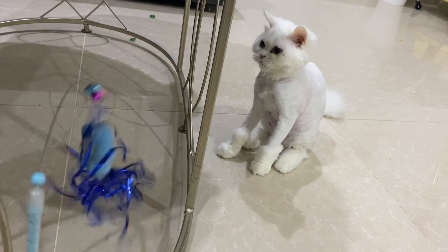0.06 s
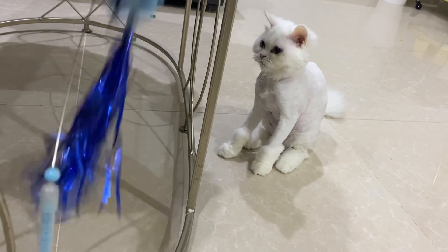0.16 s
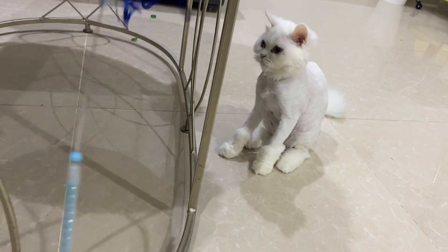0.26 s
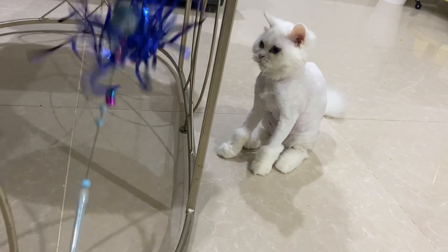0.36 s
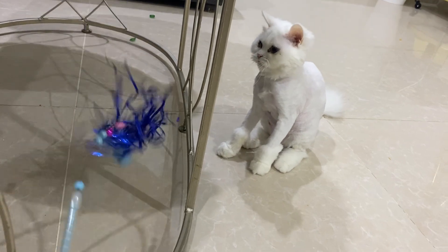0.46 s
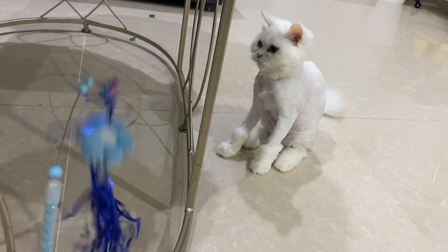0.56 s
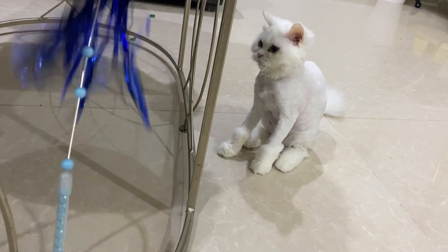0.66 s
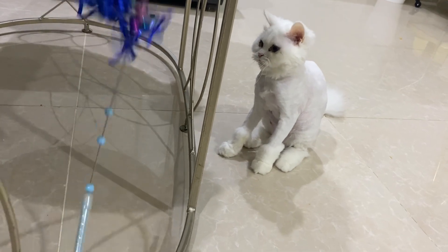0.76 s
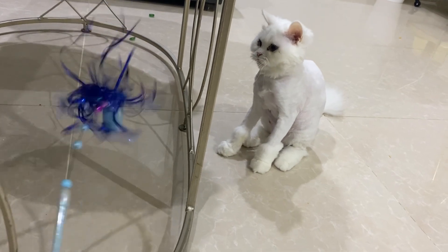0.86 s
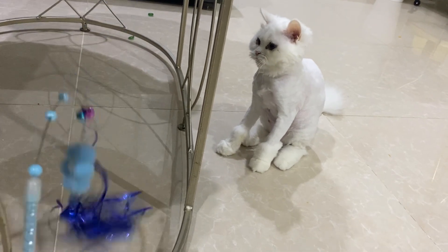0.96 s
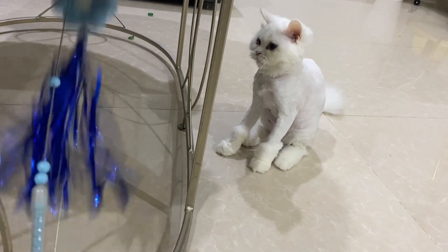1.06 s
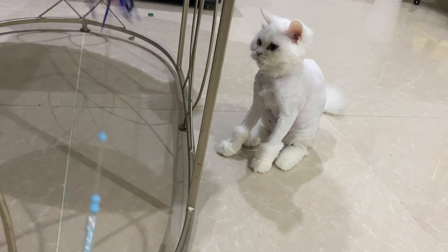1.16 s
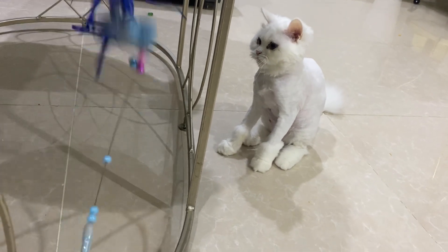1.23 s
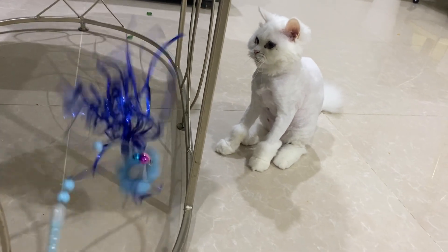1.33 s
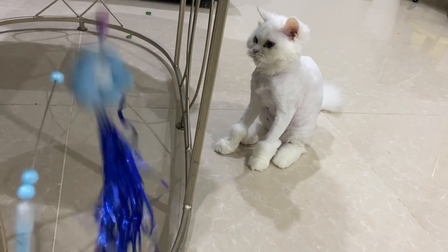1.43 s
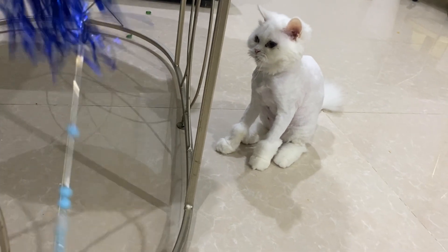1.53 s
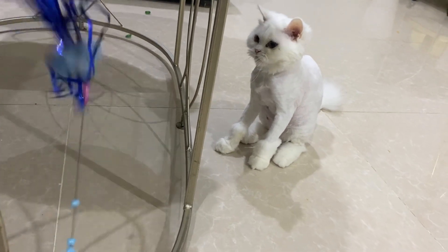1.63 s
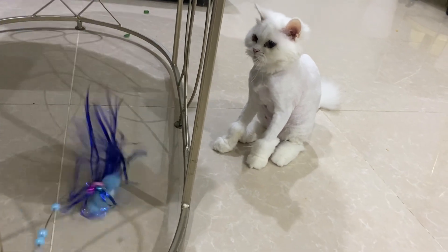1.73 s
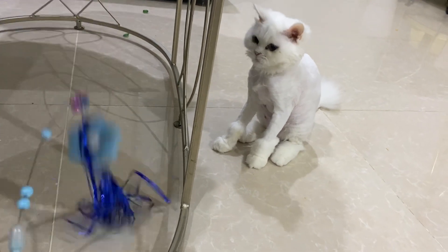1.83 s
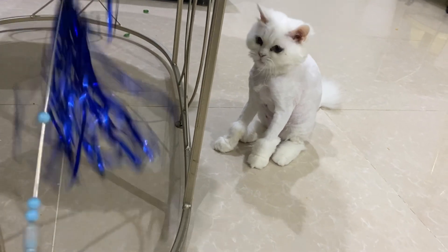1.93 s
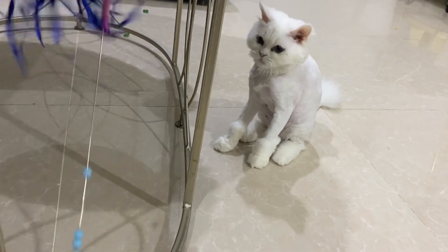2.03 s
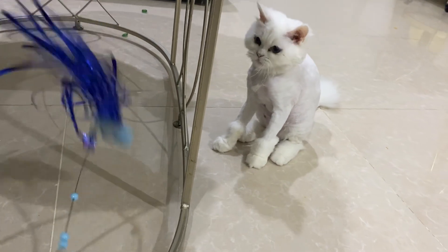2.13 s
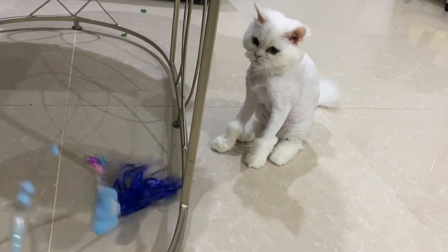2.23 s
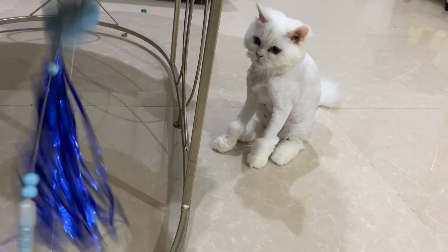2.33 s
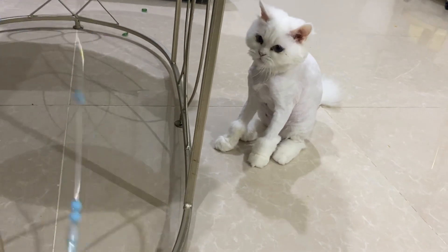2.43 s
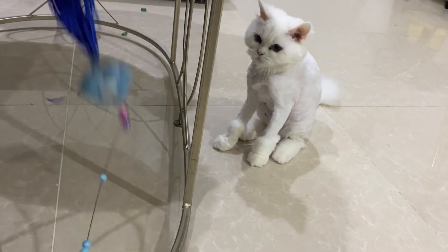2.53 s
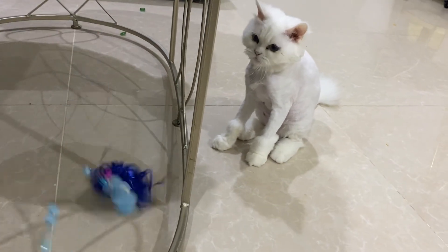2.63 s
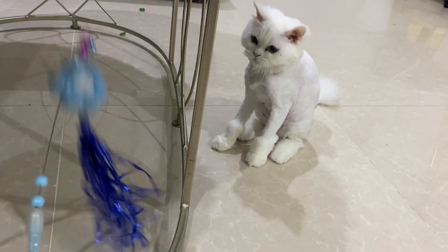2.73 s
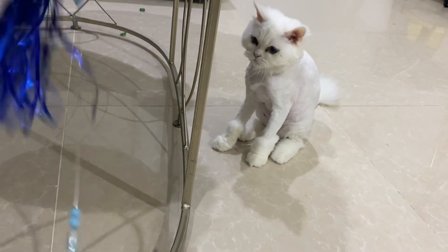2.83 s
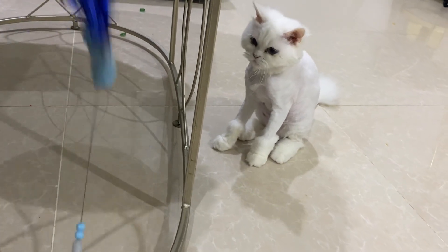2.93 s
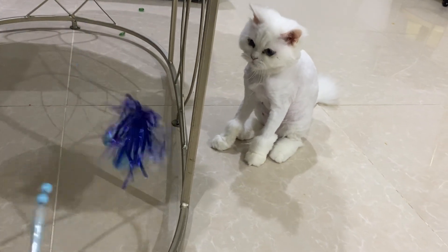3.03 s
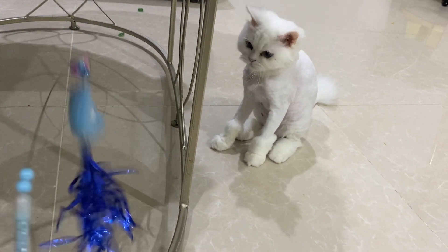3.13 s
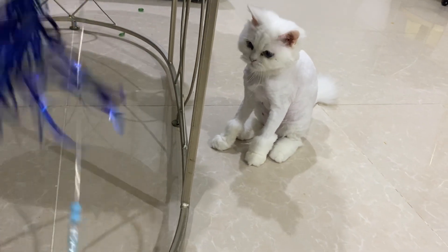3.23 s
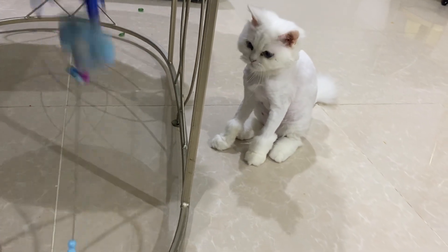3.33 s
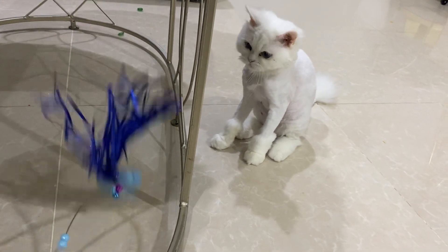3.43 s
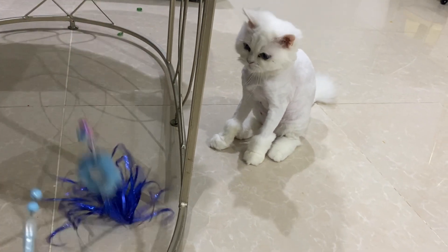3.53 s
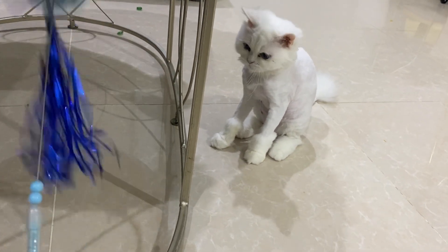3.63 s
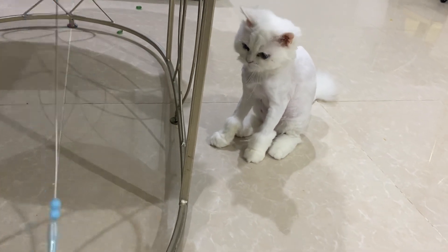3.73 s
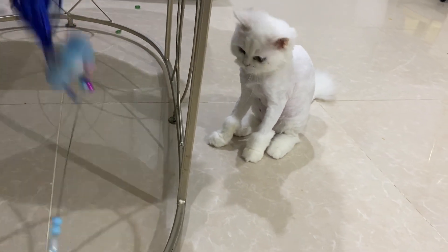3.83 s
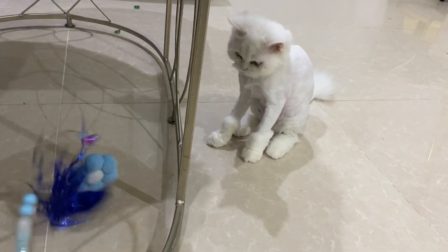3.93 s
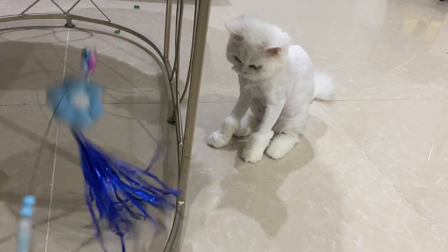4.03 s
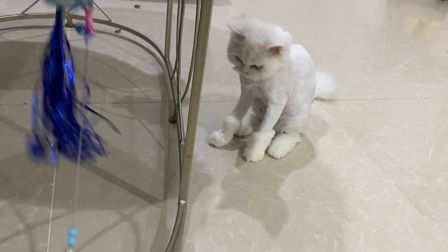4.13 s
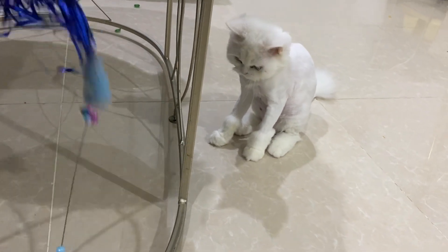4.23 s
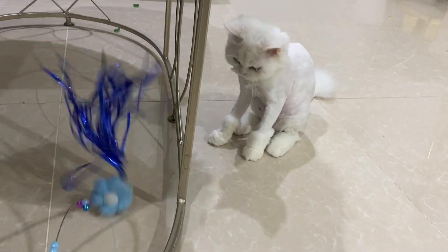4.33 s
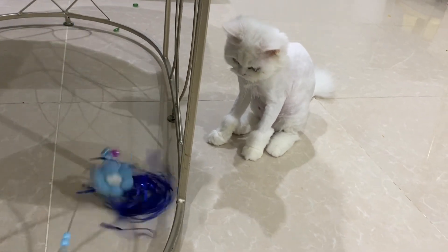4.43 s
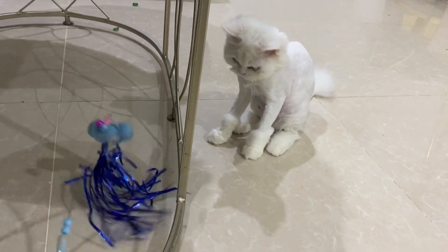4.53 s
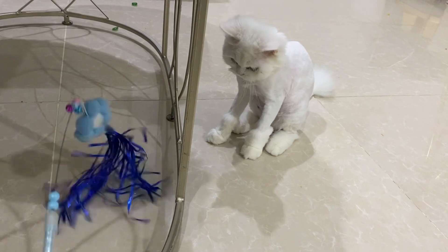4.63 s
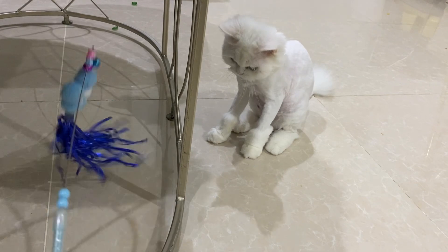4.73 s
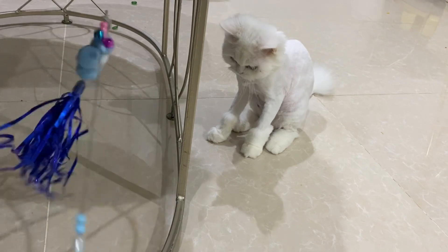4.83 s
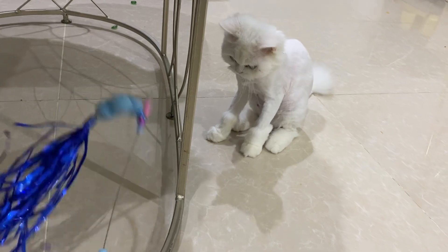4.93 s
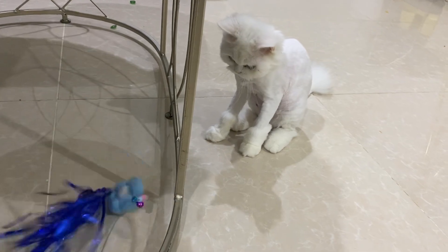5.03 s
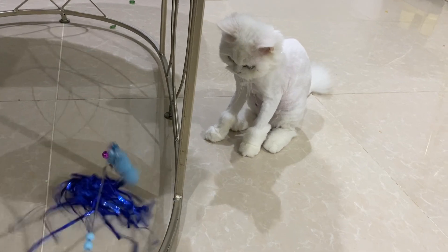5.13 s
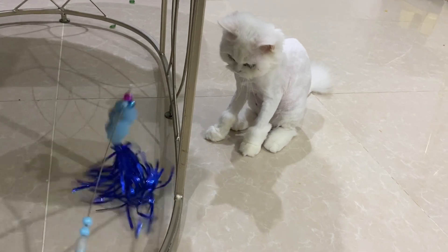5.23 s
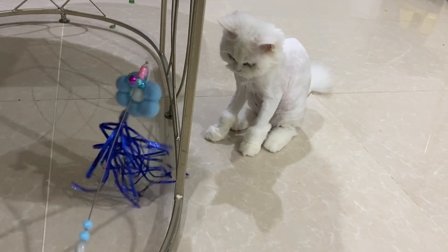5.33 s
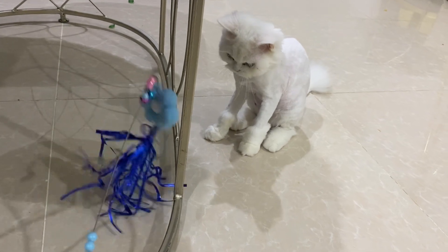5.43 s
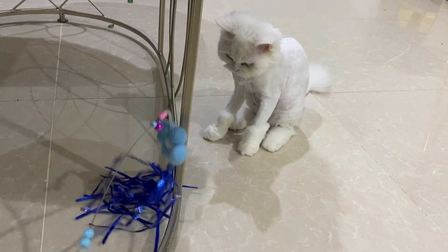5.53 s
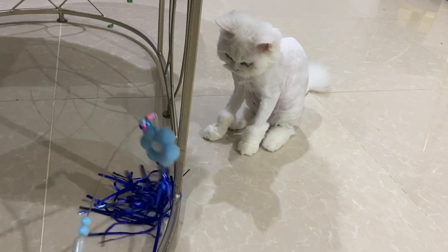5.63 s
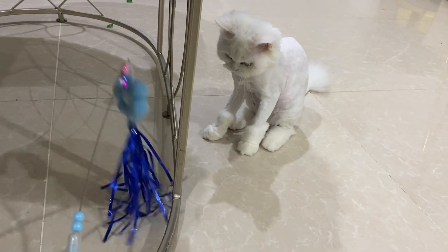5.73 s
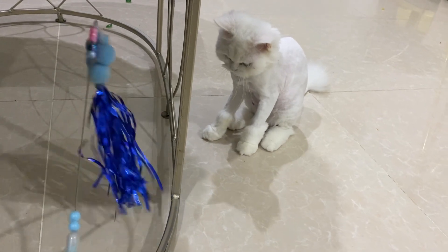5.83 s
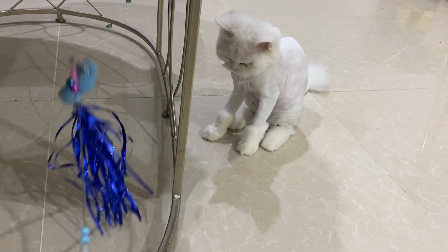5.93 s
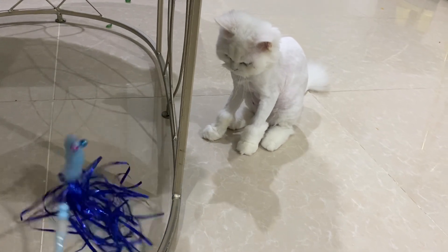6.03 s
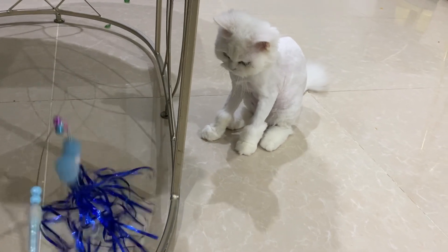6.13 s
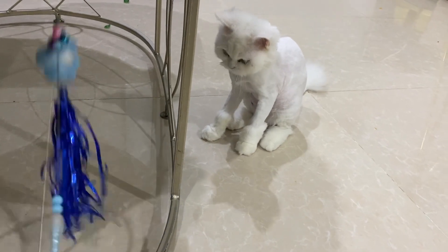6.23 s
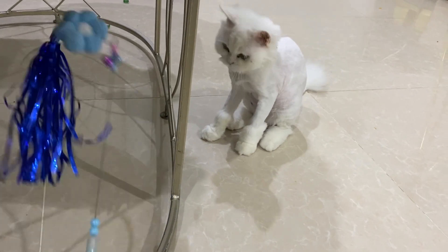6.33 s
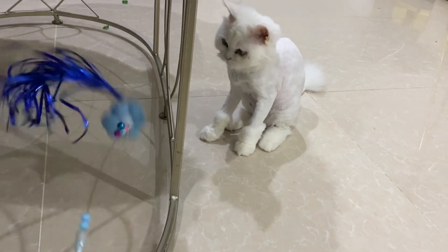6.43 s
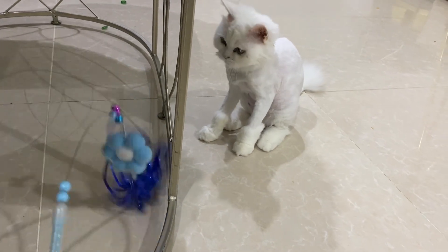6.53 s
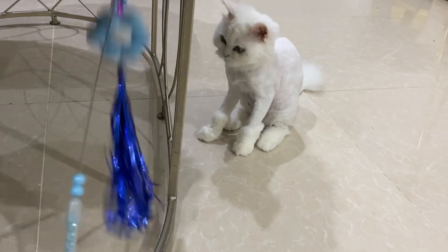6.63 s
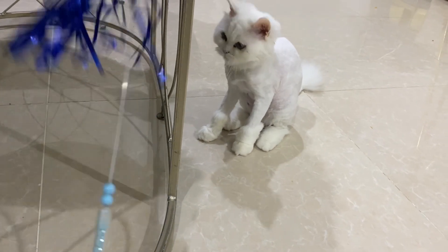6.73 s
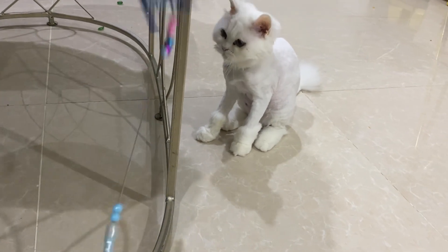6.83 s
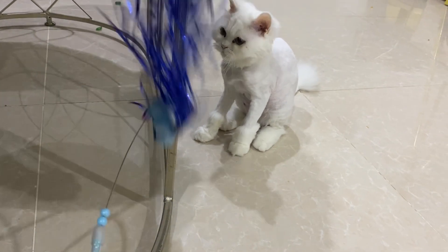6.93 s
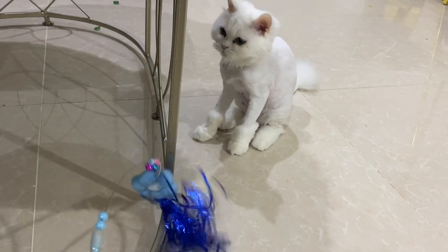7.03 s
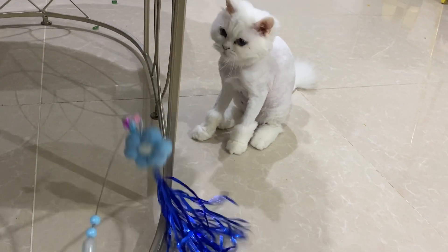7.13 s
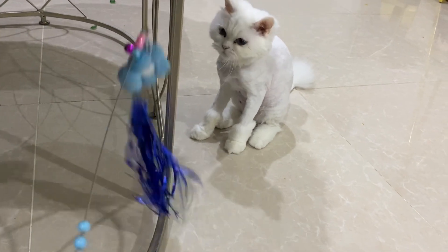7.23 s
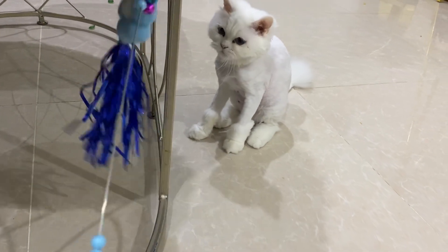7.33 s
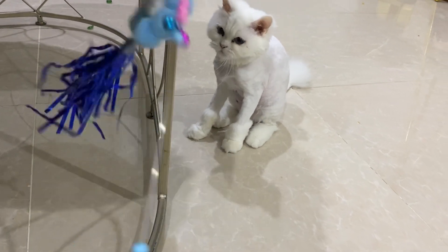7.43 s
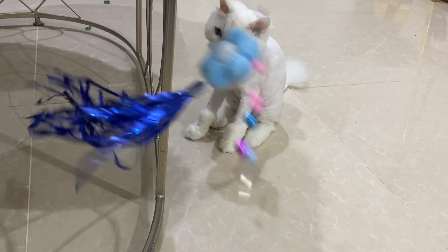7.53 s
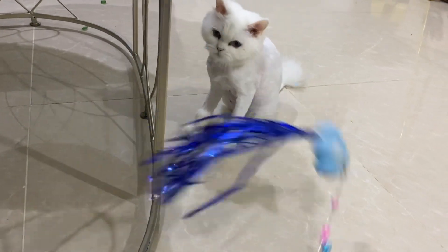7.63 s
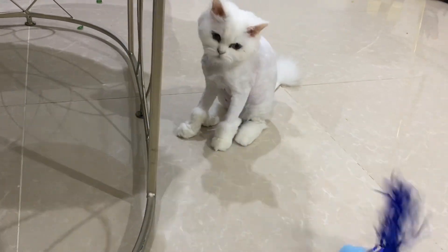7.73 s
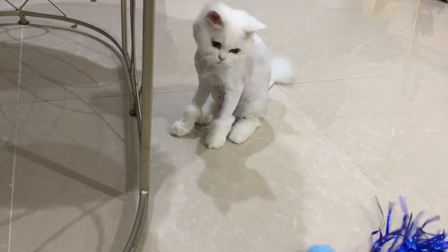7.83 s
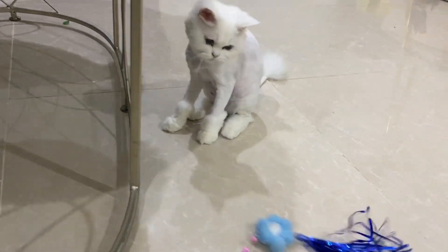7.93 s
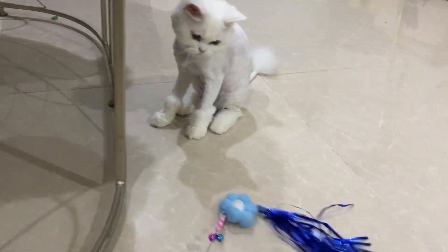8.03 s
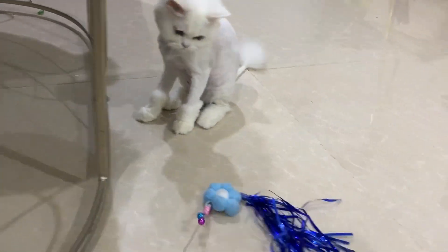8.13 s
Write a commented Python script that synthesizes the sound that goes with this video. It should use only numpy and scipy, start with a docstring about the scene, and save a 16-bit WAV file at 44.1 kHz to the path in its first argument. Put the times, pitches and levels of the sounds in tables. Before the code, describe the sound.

A wand toy is shaken close to the microphone in a tiled room. From the start, a tiny bell rattles in short, very high, uneven jingles, while foil tinsel swishes and crackles and beads give dry clicks. The toy slaps the floor or a table leg at about 0.2, 0.7, 1.5 and 1.7 seconds, then three times between 2.2 and 2.6, with small cracks, hollow thuds and sometimes a faint ring of metal. The tinsel whips most strongly from about 2 to 4 seconds. After that the play thins out, nearly pausing around 5.7 seconds, then picks up near 6. A slap at 6.8 seconds rings the metal frame, and a lighter one follows at 7.7, with jingling and rustling continuing until about 8 seconds. Throughout, a low motor hums and throbs softly over the rumble of the room.

```python
"""A tiled room, a phone's stereo microphone close to a wand toy, the right port facing it.
From the start the toy is flicked up and down: a pellet strikes the shell of a tiny bell, foil tinsel
swishes and crackles, beads click, and the toy slaps floor or table leg, ringing the metal frame.
After 4 s the play thins out; near 6 s it picks up, with two last slaps at 6.8 and 7.7 s.
Behind it all a motor hums and throbs over the room's rumble."""
import sys
import numpy as np
from scipy import signal
from scipy.fft import rfft, irfft, next_fast_len
from scipy.io import wavfile
from scipy.ndimage import uniform_filter1d, map_coordinates

SR = 44100
rng = np.random.default_rng(int(sys.argv[2]) if len(sys.argv) > 2 else 0)


def file_out(sig):
    """Save sig as 16-bit WAV at sys.argv[1]."""
    # one column per channel
    cols = np.atleast_2d(sig).T
    # limit, then scale
    lim = np.clip(cols, -1, 1)
    pcm = np.round(lim * 32767).astype(np.int16)
    wavfile.write(sys.argv[1], SR, pcm)


N = 360738
T, FFT_SIZE = np.arange(N) / SR, next_fast_len(N)

# the clearer strikes of the pellet: start_s, ring_db, tick_db, t60_s
PELLET_STRIKES = [(0.0379, -16, -31, 0.034), (0.0917, -22, -45, 0.053), (0.1697, -20, -10, 0.041),
                  (0.174, -19, -24, 0.03), (0.2667, -22, -24, 0.015), (0.43, -19, -35, 0.037),
                  (0.4345, -15.5, -35, 0.053), (0.5855, -13.5, -27, 0.015), (0.6554, -4, -14, 0.022),
                  (0.7947, -10, -25, 0.024), (0.8061, -19, -41, 0.025), (0.9286, -17, -26.5, 0.015),
                  (1.1159, -10, -19, 0.034), (1.2006, -20.5, -43, 0.029), (1.2664, -29, -42, 0.02),
                  (1.2775, -29.5, -43, 0.06), (1.2834, -26, -42, 0.026), (1.307, -27, -60, 0.016),
                  (1.3538, -17, -27, 0.041), (1.3606, -19, -35, 0.049), (1.3798, -16, -38, 0.029),
                  (1.483, -25, -17, 0.08), (1.4891, -4.5, -16, 0.027), (1.5259, -23, -42, 0.038),
                  (1.6879, -18.5, -26, 0.052), (1.7291, -33, -36, 0.08), (1.7486, -30, -27, 0.069),
                  (1.7873, -13, -25.5, 0.03), (1.8344, -17.5, -42, 0.048), (1.8473, -22, -45, 0.016),
                  (1.919, -17, -34, 0.04), (1.9741, -24, -36.5, 0.026), (1.9972, -29.5, -43, 0.047),
                  (2.0762, -17, -27, 0.023), (2.1032, -21.5, -41, 0.03), (2.123, -30, -44, 0.016),
                  (2.1821, -18, -35, 0.02), (2.1889, -6.5, -18, 0.04), (2.2567, -15, -38, 0.024),
                  (2.309, -7, -34, 0.034), (2.3706, -17, -28, 0.027), (2.488, -24.5, -37, 0.027),
                  (2.4965, -22.5, -27, 0.048), (2.5208, -20.5, -34, 0.029), (2.5365, -31, -40, 0.039),
                  (2.5634, -12, -22, 0.053), (2.613, -20, -37, 0.035), (2.6302, -23, -38, 0.056),
                  (2.7283, -17, -39, 0.045), (2.7441, -23, -39, 0.015), (2.8502, -19, -44, 0.02),
                  (2.9146, -31, -51, 0.015), (2.9193, -29, -51, 0.08), (2.9344, -25.5, -45, 0.065),
                  (2.9992, -7.5, -15.5, 0.015), (3.1125, -11, -33, 0.065), (3.2113, -22, -52.5, 0.046),
                  (3.2242, -21, -44, 0.015), (3.3438, -15, -25, 0.02), (3.3521, -19, -39, 0.02),
                  (3.3895, -24, -30.5, 0.015), (3.424, -24, -30, 0.048), (3.4595, -22, -41, 0.072),
                  (3.4691, -29, -26, 0.018), (3.4892, -24, -29, 0.015), (3.4938, -21.5, -39, 0.08),
                  (3.6733, -11, -19.5, 0.038), (3.7187, -22.5, -45, 0.069), (3.8502, -17, -36, 0.034),
                  (3.8631, -21, -31, 0.016), (3.9278, -27, -45, 0.029), (3.9436, -37, -26, 0.08),
                  (3.9502, -28, -29, 0.015), (3.9818, -18, -24, 0.042), (4.039, -12.5, -25, 0.041),
                  (4.1487, -26, -48, 0.015), (4.2999, -11, -27, 0.075), (4.4755, -20, -31, 0.017),
                  (4.8772, -20, -34.5, 0.071), (4.8841, -10.5, -23, 0.023), (4.9084, -30, -54, 0.04),
                  (4.9601, -23, -46, 0.065), (4.9755, -23.5, -38, 0.08), (4.9838, -18, -35, 0.037),
                  (5.0846, -21.5, -42, 0.021), (5.1691, -29.5, -37, 0.023), (5.197, -15.5, -30.5, 0.03),
                  (5.3325, -18, -35, 0.023), (5.4273, -27, -51, 0.051), (5.5357, -30.5, -48, 0.067),
                  (5.9921, -16, -24, 0.055), (6.0275, -17, -36, 0.08), (6.0465, -15, -32, 0.064),
                  (6.1059, -20.5, -48, 0.019), (6.2649, -14, -22, 0.037), (6.3707, -21, -35, 0.049),
                  (6.3949, -24.5, -49, 0.014), (6.4979, -14.5, -29, 0.015), (6.5104, -19, -36, 0.017),
                  (6.5592, -10, -21, 0.022), (6.6857, -19, -24, 0.051), (6.8408, -30, -28, 0.08),
                  (6.8698, -22, -45, 0.11), (6.9522, -18.5, -42, 0.015), (7.2764, -30, -58, 0.038),
                  (7.4466, -12, -28.5, 0.031), (7.4743, -31, -51, 0.036), (7.5472, -24, -49, 0.038),
                  (7.5795, -19, -50, 0.062), (7.6407, -27, -46, 0.015), (7.7143, -27, -42, 0.02),
                  (7.7228, -44, -42, 0.015), (7.7346, -9, -29, 0.03), (7.8758, -18.5, -35, 0.048),
                  (7.9834, -28, -43, 0.031), (8.0335, -19.5, -35, 0.044), (8.057, -32, -58, 0.015),
                  (8.1583, -43, -38, 0.049)]
# modes of the bell's shell: pitch_hz, level_db, t60_ratio, scatter_db (from strike to strike)
SHELL_MODES = [(9166, 1, 1.07, 1), (9090, -12, 1.1, 3), (10000, -21, 1.3, 0), (7275, -10.5, 0.22, 4.5),
               (8620, -13, 0.43, 1.5), (8040, -11, 0.21, 4), (9730, -12.5, 0.31, 4.5)]
# how hard the wand is shaken, heard in tinsel and pellet: time_s, rustle_db, rolling_db
SHAKING = [(0, -51, -31), (.25, -51, -37), (.4, -64, -55), (.5, -52, -33.5), (.8, -55.5, -38),
           (1.1, -55, -41), (1.5, -53.5, -34), (2.0, -57.5, -44), (2.4, -48.5, -39.5), (2.8, -57, -38.5),
           (3.0, -67, -28.5), (3.25, -65, -47), (3.4, -65, -29.5), (3.6, -57, -44), (4.05, -50.5, -31.5),
           (4.25, -83.5, -48), (4.45, -52, -38), (4.6, -63.5, -62), (4.9, -68, -37), (5.25, -67, -43.5),
           (5.5, -67, -50), (5.82, -68, -67.5), (5.9, -63, -39.5), (6.05, -59, -37), (6.3, -80, -46),
           (6.48, -55, -33.5), (6.7, -59, -43), (6.9, -59, -45.5), (7.35, -73.5, -46.5), (7.7, -62, -39),
           (7.84, -55.5, -41), (8.18, -66, -42)]
# whips of the tinsel: peak_s, level_db, swell_s, fade_s (each per 20 dB), crisp_offset_db
TINSEL_WHIPS = [(.01, -48.5, 9, 0.08, 8.5), (0.513, -47.5, 0.2, -0.23, 6.5), (.599, -49, 0, 0.06, 8),
                (.873, -45.5, 0.05, 0.27, 1), (1.272, -53, 0.2, -0.1, 12), (1.374, -42.5, 0.15, 0.28, 3),
                (2.078, -49, 0.3, 0.3, 4), (2.199, -38, 0.04, 0.12, 7), (2.63, -41.5, .06, 0.23, 3.5),
                (2.9, -40.5, 0.07, 0.18, 5), (3.033, -38, 0.02, 0.15, 4.5), (3.205, -50.5, 0.7, 0.44, 4),
                (3.319, -44, -0.07, 0.1, 3), (3.48, -39, 0.08, 0.15, 1), (3.75, -50, 0.23, 1.3, 2.5),
                (3.952, -33, 0.0247, 0.03, 5), (4.238, -51.5, 0, 0.03, 8), (4.425, -46.5, 0.16, 0.02, 3.5),
                (4.719, -59, -0.3, 0.3, 5.5), (5.046, -50, 0.12, 0.45, 5), (5.335, -63, 0.6, 0.25, 8.5),
                (5.996, -52, 0.08, 0.33, 9.5), (6.124, -54.5, 0, .5, -9), (6.271, -63.5, 0.4, 0.9, 10),
                (6.5, -49.5, 0.09, 0.17, 8.5), (6.546, -41, -0.02, 0.1, 0), (7.051, -44, 0.12, 0.1647, 0.5),
                (7.2, -54.5, 0, 0.16, 0.5), (7.45, -64, 0, 17, -10), (7.765, -41.5, 0.0833, 0.1, 3.5)]
# spectrum of the tinsel's duller swish: frequency_hz, density_db
SWISH_SPECTRUM = [(130, -2.5), (260, -3), (500, -5.5), (1000, -7), (1800, -6.5), (3000, -4.5), (5400, 0.5),
                  (6200, -3.5), (7500, 1), (9000, -42)]
# spectrum of the tinsel's crisp top: frequency_hz, density_db
CRISP_SPECTRUM = [(5000, -8.5), (6500, 3), (8000, 4.5), (10500, 4), (13000, -0.5), (15600, 2.5),
                  (15850, -40)]
# the toy hits floor or table leg and jolts the tinsel:
# start_s, crack_db, thud_db, thud_t60_s, frame_db, jolt_db, jolt_fade_s, crisp_offset_db
TOY_SLAPS = [(.170, -22.5, -46.5, 0.83, -68, -32, 0.23, -9), (.652, -34, -44.5, 0.6, -57, -40, 0.21, 0),
             (1.484, -50, -42.5, 0.88, -51.5, -38, 0.23, -0.5),
             (1.73, -32, -53, 0.16, -61, -36.5, 0.14, 1.5), (2.2, -31, -51, 0.19, -58, -55, 0.5, 0),
             (2.374, -45, -51, 0.54, -68, -46, 0.4, -8), (2.601, -41, -34, 0.04, -54, -38.5, 0.06, 5.5),
             (3.688, -70, -53, 0.41, -64, -57, -0.14, 4), (6.84, -38.5, -50, 1, -44.5, -44.5, 0.19, 8),
             (7.745, -44.5, -57, 0.23, -61, -66, 9, 0)]
# hollow resonances of a slap: pitch_hz, width_hz, level_db
THUD_MODES = [(217, 104, 8.5), (413, 120, 5), (756, 380, 3), (1190, 69, -1.5)]
# modes of the metal table frame: pitch_hz, level_db, t60_s
FRAME_MODES = [(393, -6, 0.7), (446, -9, 0.55), (870, -20, 0.66), (1100, -12, 0.71), (1160, -11, 0.6),
               (1230, -9, 0.6), (2060, -6, 0.3), (2190, -4, 0.29), (2482, -4, 0.23), (3240, -1.5, 0.34),
               (3660, -2, 0.33), (4280, -15, .25), (5320, -1, 0.18), (5420, 9.5, 0.19), (5540, 0, 0.17)]
# hard bead clacks and hollow bumps: start_s, pitch_hz, level_db, t60_s
SMALL_KNOCKS = [(0.654, 2300, -43, 0.099), (1.485, 2340, -32.5, 0.065), (1.729, 2150, -40, 0.033),
                (2.375, 2350, -35.5, 0.058), (2.601, 192, -39, 0.061), (3.472, 336, -43, 0.05),
                (3.69, 447, -44.5, 0.17), (7.745, 1870, -46, .12), (7.762, 3190, -42, 0.086)]
# beads hitting each other: start_s, level_db
BEAD_CLICKS = [(0.4239, -39), (0.6559, -24), (1.1169, -32.5), (1.4866, -40), (1.6876, -43), (2.3082, -35.5),
               (2.5634, -44), (3, -30), (3.1134, -32.5), (3.6745, -42), (4.0405, -41), (4.2997, -32.5),
               (4.884, -44), (4.9834, -40), (5.196, -39), (5.3326, -37), (5.9045, -50), (6.2667, -41),
               (6.686, -43), (7.447, -43), (7.7214, -37), (7.875, -33), (8.0331, -48)]
# tones of the motor: pitch_hz, rms_db, throb_depth (0-1)
MOTOR_TONES = [(58.7, -57, 0.06), (117.4, -57, 0.52), (233.5, -69, 0.03)]
# spectrum of the room tone: frequency_hz, density_db
ROOM_SPECTRUM = [(15, -52), (30, 0.5), (97, 2.5), (180, -7.5), (237, -14), (401, -13.5), (528, -24.5),
                 (1070, -42), (3310, -45), (6000, -45), (7800, -47), (13200, -120)]

RING_T60_S, RING_SCATTER, STRIKE_RISE_S = 0.044, 0.21, 0.00043
THROB_HZ, THROB_PEAK_S = 3.0, 5.75
ROOM_DB, FLOOR_ECHO_DB, WALL_ECHO_DB, ECHO_T60_S = -55, -11, -30, 0.078
PORT_LAG_S, TREBLE_HZ, ANTIPHASE_HZ = 10.1 / SR, 6300, 9100
SIDE = np.array([[1], [-1]])  # opposite signs at the left and right ports


def bell():
    """Each pellet strike ticks and rings the shell's modes; rolling gives many small strikes."""
    hz, db, t60_ratio, scatter_db = np.transpose(SHELL_MODES)[:, :, None]
    shake_s, _, rolling_db = np.transpose(SHAKING)
    when, force = rng.random((1100, 2)).T
    roll_s = when * N / SR
    roll_db = np.interp(roll_s, shake_s, rolling_db) + np.minimum(-3 * np.log(1 - force), 5)
    strikes = list(PELLET_STRIKES) + [(s, v, v - 21, RING_T60_S) for s, v in zip(roll_s, roll_db)]
    tick = 0.62 * np.exp(-T[:600] / 0.00034) + 0.35 * np.exp(-T[:600] / 0.004)
    tick *= 1 - np.exp(-T[:600] / STRIKE_RISE_S)
    ring, ticks, snaps = np.zeros((3, N))
    for s, ring_db, tick_db, t60 in strikes:
        louder, detune, phase, longer = rng.standard_normal((4, len(SHELL_MODES), 1))
        t60 = np.clip(t60 * np.exp(RING_SCATTER * longer[0, 0]), .01, .1)
        t = T[:int(t60 * SR)]
        mode_t60 = np.where(t60_ratio > .5, t60, RING_T60_S) * t60_ratio  # damped modes always die alike
        envelope = decay(t, mode_t60) * (1 - np.exp(-(t / STRIKE_RISE_S) ** 2))
        # the swinging shell shifts its pitch a little from blow to blow
        tones = np.sin(2 * np.pi * hz * (1 + 0.0021 * detune) * t + 1.44 * phase)
        modes = undb(db + scatter_db * np.clip(louder, -2, 1)) * envelope * tones
        add(ring, s, undb(ring_db) * modes.sum(axis=0))
        add(ticks, s, undb(tick_db) * tick)
        add(snaps, s + STRIKE_RISE_S, undb([tick_db + 10]))  # the first contact
    ring *= undb(2.44 * walk(250))  # the pellet chatters on the ringing wall
    ring = filtered(ring, 4, 5500, "high")  # the ring carries no bass
    return ring + undb(5.5) * filtered(snaps + ticks * rng.standard_normal(N), 5, [6800, 15600], "band")


def tinsel():
    """Foil strips rub and crease as they whip about: returns a crisp crackle and a duller swish."""
    shake_s, rustle_db, _ = np.transpose(SHAKING)
    swish_power = undb(np.interp(T, shake_s, rustle_db)) ** 2
    crisp_power = swish_power * undb(1) ** 2
    jolts = [(s, db, .0005, fade_s, crisp_db) for s, *_, db, fade_s, crisp_db in TOY_SLAPS]
    for s, db, swell_s, fade_s, crisp_db in TINSEL_WHIPS + jolts:
        swell_s, fade_s = max(swell_s, 1 / SR), max(fade_s, .02)
        start = max(s - 2 * swell_s, 0)
        t = T[int(start * SR):int((s + 2 * fade_s) * SR)]
        whip = undb(db - 20 * np.where(t < s, (s - t) / swell_s, (t - s) / fade_s)) ** 2
        add(swish_power, start, whip)
        add(crisp_power, start, whip * undb(crisp_db) ** 2)
    flutter, flicker = undb(1.1 * walk(40)), undb(3.04 * walk(120))
    crisp = np.array([colour(crackle(1200, 4.4, bed=1.0), CRISP_SPECTRUM) for _ in range(2)])
    foil = [colour(crackle(2500, 3.1, bed=1.23), SWISH_SPECTRUM) for _ in range(2)]
    swish = crinkle(spread(*foil, alike=0.34))
    return np.sqrt(crisp_power) * flutter * flicker * crisp, np.sqrt(swish_power) * flutter * swish


def crackle(rate_hz, scatter_db, bed):
    """Sparse creases of uneven size over a bed of noise."""
    chance, polarity, size = rng.random((3, N))
    click_db = np.minimum(-scatter_db * np.log(1 - size), 10)
    clicks = (chance < rate_hz / SR) * np.sign(polarity - .5) * undb(click_db)
    return unit(clicks) + bed * rng.standard_normal(N)


def crinkle(x, patch_s=.018, patch_octaves=0.2996, depth_db=3):
    """Each strip sounds in its own narrow range for a moment: levels wander in pitch and time."""
    f, t, spectrum = signal.stft(x, SR, nperseg=256)
    grid = np.meshgrid(np.log2(f / 100 + 1) / patch_octaves, t / patch_s, indexing="ij")
    gain_db = depth_db * map_coordinates(rng.standard_normal((60, 1000)), grid, order=1, mode="wrap")
    y = signal.istft(spectrum * undb(gain_db), SR)[1][..., :N]
    return y * np.sqrt(np.mean(x ** 2) / np.mean(y ** 2))


def slaps():
    """The toy lands: a crack of foil, a hollow thud that dies as noise, and the table frame's ring."""
    crack, thud, ring, t = np.zeros(N), np.zeros(N), np.zeros((2, N)), T[:14000]
    hz, db, t60 = np.transpose(FRAME_MODES)[:, :, None]
    envelope = decay(t, np.clip(t60, .05, .5)) * (1 - np.exp(-t / 0.002))
    modes = undb(db) * envelope * np.sin(2 * np.pi * hz * t)
    right_gain = np.where(hz > 2000, -.3, 1)  # short waves from the long tubes differ between the ports
    for s, crack_db, thud_db, thud_t60, frame_db, *_ in TOY_SLAPS:
        add(ring[0], s, undb(frame_db) * modes.sum(axis=0))
        add(ring[1], s, undb(frame_db) * (right_gain * modes).sum(axis=0))
        add(crack, s, undb(crack_db) * (np.exp(-t / 0.0065) + undb(4) * np.exp(-t / .0005)))
        add(thud, s, undb(thud_db) * decay(t, thud_t60))
    f = np.fft.rfftfreq(FFT_SIZE, 1 / SR)
    hollow = sum(undb(db) / (1 + 2j * (f - hz) / width) for hz, width, db in THUD_MODES)
    crack_spectrum = [(400, -19), (1000, 5), (2500, 3), (5500, 15), (9000, 4), (15000, -7)]
    burst = [colour(rng.standard_normal(N), crack_spectrum) for _ in range(2)]
    body = [unit(irfft(rfft(rng.standard_normal(FFT_SIZE)) * hollow, FFT_SIZE)[:N]) for _ in range(2)]
    buzz = undb(4.9 * walk(90))  # loose joints in the frame
    return crack * spread(*burst, alike=0.33) + thud * spread(*body, alike=0.45) + ring * buzz


def knocks():
    """Each clack or bump rings two tight clusters of modes, rough and dying fast."""
    out, t = np.zeros(N), T[:9000]
    for s, hz, db, t60 in SMALL_KNOCKS:
        detune, phase = rng.standard_normal((2, 2, 4, 1))
        mode_hz = hz * np.array([1, 1.2])[:, None, None] * (1 + .05 * detune)
        lower, upper = np.sin(2 * np.pi * (mode_hz * t + phase)).sum(axis=1) / 2
        envelope = decay(t, t60) * (1 - np.exp(-t / 0.0011))
        add(out, s, undb(db) * (lower + undb(-5) * upper) * envelope)
    return out


def beads():
    """Beads collide in dry, hard clicks in the upper middle, each a little different."""
    out, t = np.zeros(N), T[:300]
    for s, db in BEAD_CLICKS:
        add(out, s, undb(db) * rng.standard_normal(len(t)) * np.exp(-t / 0.0012))
    return undb(2.5) * filtered(out, 2, [3300, 6500], "band")


def motor():
    """A motor hums in the background; its low tones waver and throb."""
    throb = np.cos(2 * np.pi * THROB_HZ * (T - THROB_PEAK_S))
    hum = np.zeros(N)
    for hz, db, depth in MOTOR_TONES:
        waver = rng.random() + 0.046 * walk(2.39)
        level = np.sqrt(2) * undb(db + walk(2.37)) * (1 + depth * throb)
        hum += level * np.sin(2 * np.pi * (hz * T + waver))
    return hum


def room_tone():
    """The room's nearly steady rumble and faint hiss."""
    air = [colour(rng.standard_normal(N), ROOM_SPECTRUM) for _ in range(2)]
    return undb(ROOM_DB + 0.18 * walk(2.99)) * spread(*air, alike=0.51)


def reflections(x):
    """A short wash of echoes from tiles and walls."""
    t = T[200:16000]
    tail = rng.standard_normal(len(t)) * decay(t, ECHO_T60_S)
    return signal.fftconvolve(x, np.r_[np.zeros(200), tail / np.sqrt(np.sum(tail ** 2))])[:N]


def ports(x):
    """The right port faces the toy; treble reaches the left later, out of phase at the bell's pitch."""
    f = np.fft.rfftfreq(FFT_SIZE, 1 / SR)
    turn = np.where(f > TREBLE_HZ, -np.exp(-2j * np.pi * (f - ANTIPHASE_HZ) * PORT_LAG_S), 1)
    return np.array([irfft(rfft(x, FFT_SIZE) * turn, FFT_SIZE)[:N], x])


def spread(mid, side, alike):
    """Mid and side to left and right; long waves reach both ports alike."""
    return np.sqrt((1 + alike) / 2) * mid + np.sqrt((1 - alike) / 2) * filtered(side, 1, 120, "high") * SIDE


def colour(x, points):
    """Shape by (frequency_hz, level_db) points; rms 1."""
    hz, db = np.transpose(points)
    f = np.fft.rfftfreq(FFT_SIZE, 1 / SR) + 1
    gain = undb(np.interp(np.log(f), np.log(hz), db, left=-60, right=-60))
    return unit(irfft(rfft(x, FFT_SIZE) * gain, FFT_SIZE)[:N])


def walk(rate_hz):
    """Random levels held 1 / rate_hz s and smoothed twice; spread near 1."""
    hold = int(SR / rate_hz)
    steps = np.repeat(rng.standard_normal(N // hold + 1), hold)
    return 1.62 * uniform_filter1d(uniform_filter1d(steps, hold), hold)[:N]


def add(out, start_s, sound):
    i = int(start_s * SR)
    out[i:i + len(sound)] += sound[:len(out) - i]


def filtered(x, order, hz, kind):
    return signal.sosfilt(signal.butter(order, hz, kind, fs=SR, output="sos"), x)


def decay(t, t60):
    return np.exp(-np.log(1000) * t / t60)


def undb(db):
    return 10 ** (np.asarray(db) / 20)


def unit(x):
    return x / np.sqrt(np.mean(x ** 2))


def scene():
    """The toy close up, motor and room behind it, as the two ports hear them."""
    (crisp, crisp_side), swish = tinsel()
    bright = bell() + crisp
    duller = swish + slaps() + knocks() + beads() + motor() + room_tone()
    duller *= undb([[1], [-1]])  # the left port is a little more sensitive below the treble
    # floor echoes come from the toy's side; the wider room meets both ports together
    near = ports(bright + undb(FLOOR_ECHO_DB) * reflections(bright))
    walls = undb(WALL_ECHO_DB) * reflections(bright)
    return near + walls + duller + undb(-14) * crisp_side * SIDE


def record(dry):
    """The microphone drops the deepest bass, rounds the loudest peaks and cuts the top steeply."""
    rounded = 1.1 * np.tanh(filtered(dry, 3, 45, "high") / 1.1)
    return signal.sosfilt(signal.ellip(10, .2, 80, 16900, fs=SR, output="sos"), rounded)


dry = scene()
out = record(dry)
file_out(out)
```